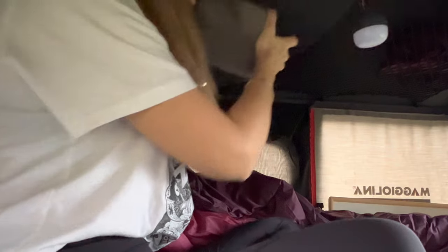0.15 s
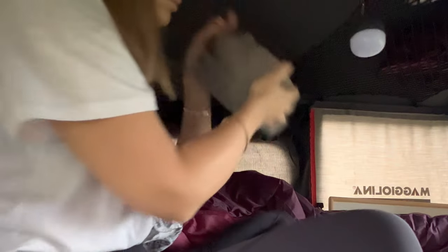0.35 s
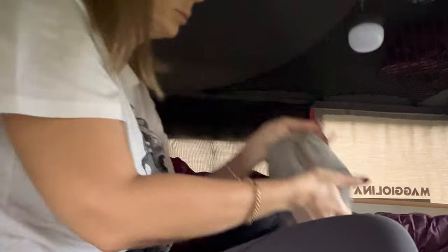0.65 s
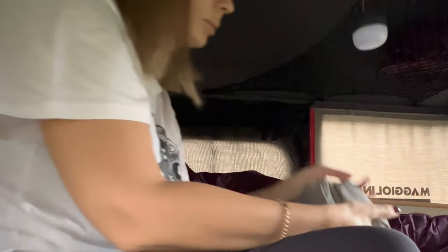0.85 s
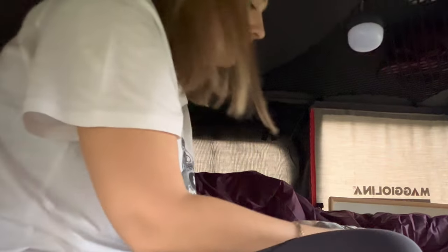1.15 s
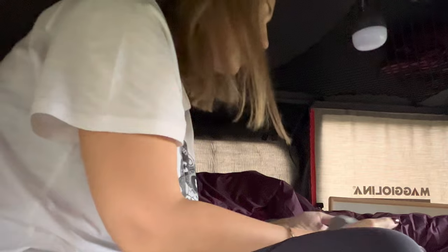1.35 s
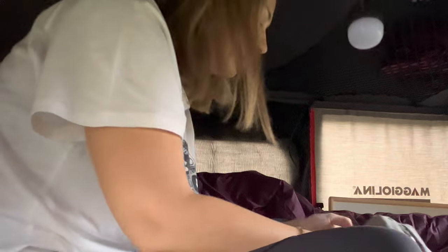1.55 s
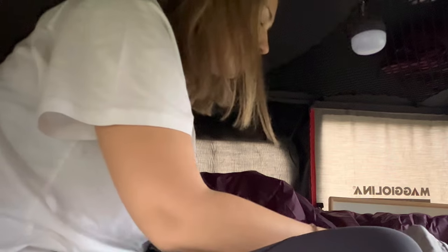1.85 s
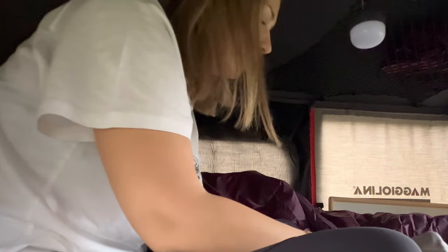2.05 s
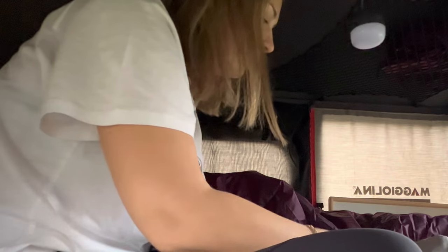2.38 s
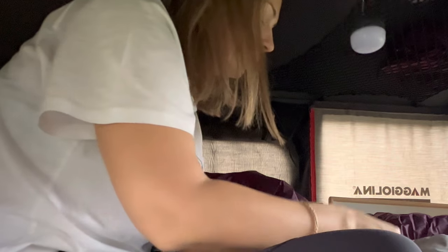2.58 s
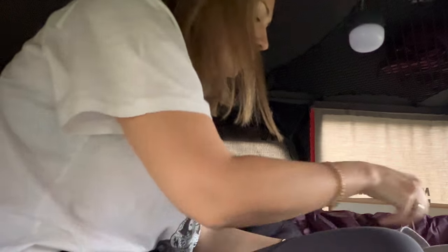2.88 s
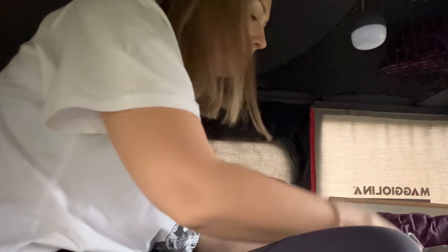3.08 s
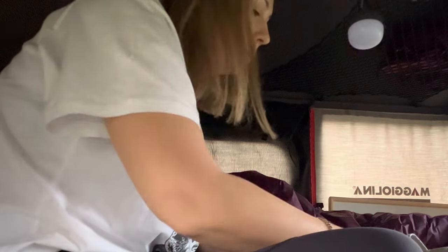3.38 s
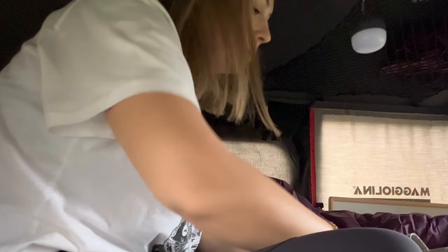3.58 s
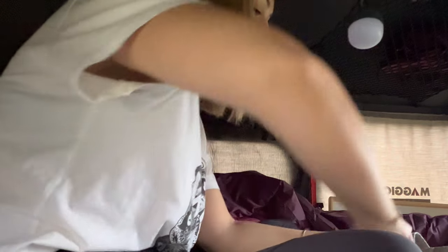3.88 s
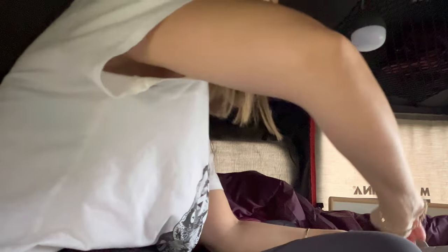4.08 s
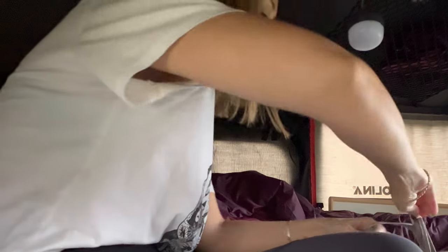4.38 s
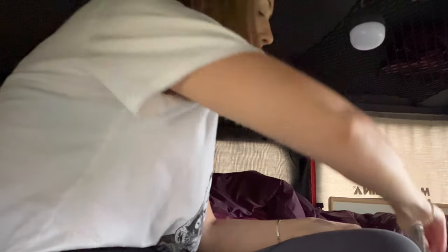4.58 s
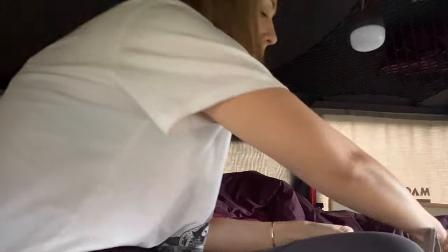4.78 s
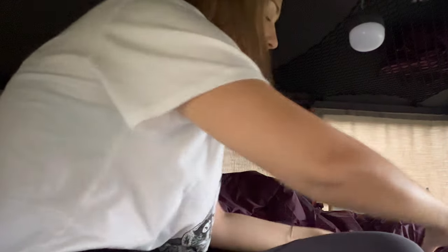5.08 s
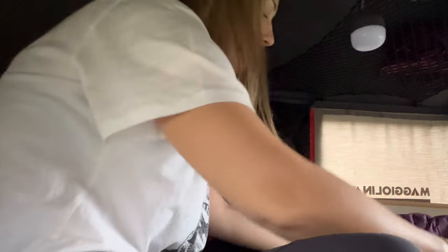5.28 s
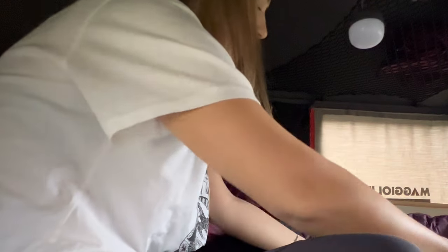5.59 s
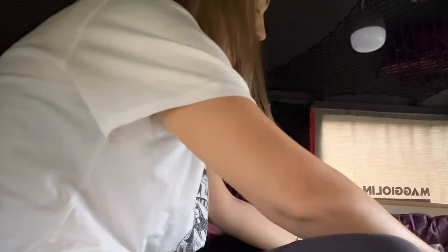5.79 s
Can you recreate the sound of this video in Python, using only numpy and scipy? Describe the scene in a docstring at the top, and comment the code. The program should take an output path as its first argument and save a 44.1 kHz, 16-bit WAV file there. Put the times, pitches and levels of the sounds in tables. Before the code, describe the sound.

Heard close on a phone: weight shifts dully on a padded floor and slick nylon swishes. A pouch smacks down on bedding, much the loudest moment. Small crease ticks follow, with a weak slow zip pull, then a burst of four zipper jerks, the second fastest and rising to a bright whine, with clicks. Rustling and soft rumble continue in a dry, boxy little tent.

```python
"""In a small hard-roofed tent, weight shifts on the padded floor and rubbed nylon open the scene near a phone.
A pouch is reached for overhead, rings hollow under the roof until 0.8 s and drops on nylon bedding at 1 s.
Its zip is jerked once at 2.4 s and four times from 3.9 to 4.7 s: teeth hum, knock, click and scrape with the
pull speed. Rubs, crease ticks and floor rumble run on to the end. Filtered noise makes cloth, floor and air,
sines the hum and thumps, short bursts the ticks; one set of cabin resonances colours hum, knocks and mids."""
import sys
import numpy as np
from scipy import signal
from scipy.fft import rfft, irfft, next_fast_len
from scipy.io import wavfile
from scipy.ndimage import uniform_filter1d

SR = 44100
rng = np.random.default_rng(int(sys.argv[2]) if len(sys.argv) > 2 else 0)


def waveform_to_disk(signal):
    """Save audio, clipped to [-1, 1], as 16-bit WAV at the path in sys.argv[1]."""
    frames = np.transpose(np.atleast_2d(signal))
    scaled = np.clip(frames, -1, 1) * 32767
    samples = np.round(scaled).astype(np.int16)
    wavfile.write(sys.argv[1], SR, samples)


N = 261953

# Every level below is set ahead of the cabin, the mix gains and the phone.
# faint air: [f/Hz, level/dB per Hz, relative]
AIR_SPECTRUM = [(24, -38.5), (40, 0), (151, 1), (439, -17), (712, -3), (886, -13), (1740, -13), (2970, -39),
                (6290, -25), (13000, -37)]
AIR_DB = -76  # rms
# weight shifting on the padded floor: [full from t/s, hold/s, rise/s, fall/s, rumble level/dB, thud level/dB]
FLOOR_SHIFTS = [(0.0, 0.003, .01, 0.03, -37.5, -37.5), (.11, 0.029, 0.5, 0.1, -68, -57),
                (.205, 0.024, 0.045, 0.18, -37.5, -57.5), (.33, 0.015, 0.052, 0.18, -35, -55),
                (.47, 0.023, 0.092, 0.084, -46, -90), (.58, 0.01, 0.15, 0.22, -54.5, -63),
                (1.0, 0.017, 0.033, 0.067, -44.5, -44), (1.04, 0.02, 0.08, 0.32, -55.5, -62),
                (1.2, 1, 0.25, 0.24, -67.5, -72), (1.93, .02, 0.62, 0.38, -58, -62.5),
                (2.68, 0.1, 0.48, 0.8, -69, -61), (2.95, 0.024, 0.66, 0.086, -60.5, -75),
                (3.09, 0.0066, .06, 0.071, -71.5, -78.5), (3.41, 0.012, 0.14, 0.054, -59.5, -68.5),
                (4.2, .01, 0.058, 0.51, -54.5, -53), (4.55, 0.015, 1, 0.063, -74, -51),
                (4.7, 0.0062, 0.13, 0.058, -52, -52), (4.83, 0.31, 0.18, 0.082, -61.5, -69.5),
                (5.21, 0.0093, 0.88, 0.7, -57, -59), (5.34, 0.01, 0.039, 0.55, -54, -67),
                (5.52, 0.0084, 0.25, 0.23, -59, -83), (5.76, 0.018, 0.1, 0.47, -53, -65.5)]
LEAN_S = (0.177, 0.6)  # span of the reach overhead
LEAN_TURN, REST_TURN = 2.63, 0.09  # radians the left port leads during the reach and otherwise
# soft blows on the bedding: [t/s, peak level/dB, ring f/Hz, 60 dB decay/s]
BEDDING_BLOWS = [(0.995, -28.5, 270, 0.061), (1.033, -41, 70, 0.24), (.999, -27, 570, 0.049),
                 (2.685, -33.5, 162, 0.045)]
# resonances of the cabin: [f/Hz, width/Hz, level/dB]
CABIN_MODES = [(65, 29, 3), (189.4, 42, -4), (315, 42, 3), (635.5, 47, 3.5), (722, 62, 3.5), (1086, 52, 5),
               (1350, 93, -6.5), (1801, 89, 0.5), (2090, 140, -6), (2460, 180, -6.5), (3500, 330, -28.5)]
# phase by which the left port trails for sounds close to the phone: [f/Hz, phase/rad]
NEAR_PHASE = [(100, 0.46), (700, 1), (1500, 0.26), (16000, 0.11)]
# nylon rubbed on nylon:
# [full from t/s, hold/s, rise/s, fall/s, crumple level/dB, swish level/dB, sheen level/dB re swish]
NYLON_RUBS = [(0.098, 0.051, 0.2, 0.12, -66.5, -51, 9), (0.289, 0.05, 0.17, 0.15, -75, -64.5, 8.5),
              (0.549, 0.15, 0.21, 0.17, -68.5, -56, 6), (0.956, 0.034, 0.29, 0.069, -65, -56, 6.5),
              (0.987, 0.022, 0.0044, 0.057, -39.5, -38.5, 0), (1.045, 0.0076, .05, 0.22, -62, -59, 7),
              (1.168, 0.38, 0.3, 0.35, -70.5, -68.5, -10), (1.87, 0.0057, 1, 0.72, -64, -56, 13.5),
              (2.222, 0.23, 0.16, 0.02, -78, -75.5, -10), (2.557, 0.078, 0.2, 0.081, -57, -70, -17),
              (2.665, 0.021, 0.0087, 0.07, -62, -51.5, 7), (2.717, 0.12, 0.12, 0.11, -60.5, -63.5, 9),
              (2.903, 0.07, 0.089, 0.23, -67, -70, 1.5), (3.14, 0.019, 0.084, 0.12, -74, -67, 7.5),
              (3.312, 0.011, 0.089, 0.32, -74, -67.5, 12), (3.659, 0.014, 0.15, 0.17, -74, -62, 10),
              (3.822, 0.05, 0.13, 0.11, -70, -62, 7), (4.2, 0.019, 0.035, 0.18, -52, -56, 12),
              (4.378, 0.0096, 0.11, 0.15, -54, -58.5, 13), (4.723, 0.025, 0.049, 0.16, -62.5, -62, -8),
              (4.81, 0.015, 0.13, 0.44, -59.5, -51.5, 10), (4.991, 0.3, 0.085, 0.64, -65, -57.5, 10.5),
              (5.4, 0.014, 0.08, 0.12, -59, -54, 7.5), (5.565, 0.097, 0.083, 0.014, -68, -58, 8),
              (5.757, 0.027, 0.015, 0.073, -61, -53.5, 3), (5.93, .01, 0.79, .1, -60, -54, 12.5)]
# tone of the swish: [f/Hz, level/dB per Hz, relative]
SWISH_SPECTRUM = [(1500, -4), (2500, -3.5), (3300, -4), (4600, -0.5), (6700, -2), (9000, -8),
                  (11500, -15.5), (13500, -25), (15800, -7)]
RANGE_DB = 27  # a rub or shift fades this far over its rise and its fall
CRUMPLE_PAN_DB, SWISH_PAN_DB = -3.5, 2.5  # left minus right
ALOFT_UNTIL_S, ALOFT_HZ, ALOFT_DB = 0.77, (1216, 1426), 11  # pouch held under the roof; dB re crumple
# creases, puller ticks and the landing pouch:
# [t/s, peak level/dB, centre f/Hz, treble level/dB re peak, left minus right level/dB]
CLOTH_TICKS = [(0.073, -41.5, 1460, -13, 5), (0.525, -40.5, 1230, -26, 8), (0.563, -37.5, 1350, -30, 5),
               (0.644, -47, 1350, -2, 7), (0.974, -35.5, 1580, -25, -24), (0.98, -27, 1430, -23, -6),
               (0.988, -10.5, 1940, -6.5, 2), (0.992, -17, 2300, -19, -4), (0.997, -27, 1100, -20, -11),
               (1.003, -30, 1230, -23, -5), (1.019, -29, 1020, -26, -2), (1.037, -34.5, 1460, -23, -8),
               (1.077, -58, 1000, -25, -4), (1.148, -55, 950, -25, -2), (1.212, -52, 1650, -25, -5),
               (1.263, -59, 4320, -54, 6), (1.338, -47, 1000, 2.5, -6), (1.411, -43, 1110, -29, -5),
               (2.352, -44, 1370, -40, -4), (2.36, -49, 1100, -61, -9), (2.631, -54, 910, 13, -3),
               (2.666, -43.5, 2200, 3, -2), (2.681, -38, 860, -6, -7.5), (2.731, -46, 1080, -18, -3),
               (2.758, -36, 1070, -28, -6), (2.831, -43.5, 4600, -15, 2), (2.836, -40.5, 885, -22, -4),
               (2.876, -49.5, 940, 5.5, -1), (2.903, -40, 1100, -0.5, -3), (2.952, -59, 1150, -11, -8),
               (2.972, -49, 1056, -5, -2.5), (3.105, -61.5, 2440, -19, 7.5), (3.134, -56, 1100, 1, -9),
               (3.61, -48.5, 2080, -4, -1), (3.773, -52, 1830, -8, -3), (3.811, -39, 1533, -32, -4.5),
               (3.903, -50.5, 1130, -10, -10), (4.334, -44, 970, 7, -8), (4.383, -28.5, 1950, 2.5, -2),
               (4.461, -34, 2010, 2, -1), (4.511, -39, 1927, 3, -4), (4.54, -54, 1877, 12.5, 12),
               (4.722, -40.5, 2200, -2, 1), (4.741, -47, 1004, -36, -9), (4.779, -51, 747, -30, -8),
               (4.789, -35.5, 5550, -20, 6.5), (4.82, -48, 1994, 2, -2), (4.911, -45, 1090, -19, -6),
               (4.967, -47.5, 1230, -26, -11), (5.005, -46, 970, -19, -11), (5.013, -48, 1020, -14, -14),
               (5.029, -39.5, 850, -17, -6), (5.099, -41.5, 1030, 1.5, -6), (5.115, -37, 880, -16, -1),
               (5.202, -58, 1510, -15, -1), (5.225, -46, 1140, -21, -3), (5.393, -42.5, 900, -9, -8),
               (5.41, -42, 3500, -13, 2), (5.756, -45.5, 4540, -3, 0), (5.771, -46, 4750, 9.5, -11),
               (5.833, -43.5, 910, -16, -3), (5.888, -44.5, 1750, 9.5, 6)]
TICK_DECAY_S, HARD_EXTRA_S = 0.02, 0.00037  # 60 dB decay; harder blows ring a little longer
HAND_DAMPING = 2.2  # cloth in the hands widens the resonances that a tick excites
CREASES = 420  # small random ticks
CREASE_DB, CREASE_SPREAD_DB = 4.5, 3.5  # re the rub's crumple level
CREASE_HZ, CREASE_TREBLE_DB = 1100, -12.5  # typical centre; typical treble re peak
# slider strokes, one list of rows per jerk: [t/s, tooth rate f/Hz, hum level/dB, knock level/dB]
ZIP_JERKS = [
    [(2.44, 113.5, -97, -86), (2.5, 122.9, -81, -72), (2.57, 155.2, -56, -74), (2.61, 179.3, -71, -54),
     (2.645, 194, -57, -69)],
    [(3.9, 132, -68, -90), (3.93, 161.5, -59, -61), (3.965, 245.8, -51, -66), (3.998, 296.2, -54.5, -48.5)],
    [(4.0, 198.5, -54, -54), (4.05, 241.2, -54, -49), (4.066, 291.9, -52, -41), (4.09, 344.6, -49.5, -46.5),
     (4.102, 375, -39, -43), (4.118, 458.5, -45, -44), (4.127, 570, -57, -40.5), (4.152, 729, -34.5, -64),
     (4.168, 795.3, -35.5, -40), (4.18, 798.6, -47, -48), (4.197, 713, -49, -65)],
    [(4.2, 166.3, -47.5, -54), (4.27, 149.4, -50, -62.5), (4.32, 155.4, -71, -65), (4.36, 181.9, -50, -70),
     (4.4, 219.9, -49.5, -84), (4.44, 195, -53, -56)],
    [(4.445, 151.2, -62, -57), (4.482, 184.4, -51, -57), (4.516, 238.7, -47, -58), (4.532, 261, -48, -53),
     (4.55, 303.7, -66, -50), (4.572, 291.3, -72, -49.5), (4.615, 347.8, -51.5, -49),
     (4.638, 359.4, -49, -52), (4.652, 340.3, -69, -47.5), (4.668, 340.7, -67, -46.5),
     (4.685, 342, -68, -63), (4.697, 323, -58, -38), (4.705, 347, -83, -97)],
]
# dry click of each tooth leaving the slider, one per jerk, at the reference rate: [level/dB]
JERK_CLACK_DB = [-61.5, -58.5, -57, -67.5, -62.5]
# scrape of the slider, one per jerk, at the reference rate: [level/dB]
JERK_SCRAPE_DB = [-48, -55, -48.5, -51.5, -50]
REFERENCE_HZ = 300  # tooth rate
CLACK_HZ, CLACK_SCATTER_DB, CLACK_DB_PER_OCTAVE = (1000, 2300), 4.5, 2.2
SCRAPE_DB_PER_OCTAVE, SCRAPE_CRUMPLE_DB = 8, -10  # growth with tooth rate; mids re swish
ONSET_S = 0.064  # drag on the cloth is smoothed over this long
TOP_HZ = 15800  # upper limit of the phone
LEFT_LAG = 2  # samples; the left port is a little further from the hands


def undb(db):
    """Decibels to gain."""
    return 10 ** (np.asarray(db) / 20)


def unit(x):
    """Scale to rms 1."""
    return x / np.sqrt(np.mean(x ** 2))


def band(x, lo_hz, hi_hz, order=2):
    """Butterworth band-pass along time."""
    sos = signal.butter(order, [lo_hz, min(hi_hz, .45 * SR)], "band", fs=SR, output="sos")
    return signal.sosfilt(sos, x)


def columns(table):
    """Curve columns at every sample."""
    s, *rest = np.transpose(table)
    return [np.interp(np.arange(N) / SR, s, c) for c in rest]


def colour(x, points):
    """Shape noise by (Hz, dB) points joined on a log frequency axis; rms 1."""
    hz, db = np.transpose(points)
    bins = np.maximum(np.arange(N // 2 + 1) * SR / N, 1)
    gain = undb(np.interp(np.log(bins), np.log(hz), db))
    return unit(irfft(rfft(x) * gain, N))


def walk(rate):
    """Random levels, rate of them a second, joined by slides; rms 1."""
    k = int(SR / rate)
    steps = np.repeat(rng.standard_normal(N // k + 1), k)
    return unit(uniform_filter1d(steps, k)[:N])


def pair(likeness):
    """Left and right noise of rms 1 with the given correlation."""
    mid, side = rng.standard_normal((2, N))
    c = np.clip(likeness, 0, 1)
    return np.sqrt((1 + c) / 2) * mid + np.sqrt((1 - c) / 2) * side * np.array([[1], [-1]])


def pan(db):
    """Left and right gains for a left minus right level."""
    return undb(np.array([db, -db]) / 2)


def swells(table):
    """Rise, hold and fall of each row, summed in power; one gain curve for each level column."""
    t, power = np.arange(N) / SR, 0
    for s, hold_s, rise_s, fall_s, *db in table:
        before = np.maximum((s - t) / max(rise_s, .005), 0)
        after = np.maximum((t - s - hold_s) / max(fall_s, .005), 0)
        fade = undb(-RANGE_DB * np.minimum(before + after, 8))
        power = power + np.outer(undb(db), fade) ** 2
    return np.sqrt(power)


def grains(rate, spread_db, ring_s):
    """Envelope of many tiny creases: sparse random sizes, each dying fast, over a steady bed."""
    sizes = undb(spread_db * np.minimum(rng.exponential(size=N), 2))
    hits = (rng.random(N) < rate / SR) * sizes
    return unit(signal.lfilter([1], [1, -np.exp(-1 / (ring_s * SR))], hits) + 2.24)


def air():
    """Faint stationary noise, strongest in the bass and wide between the ports."""
    return colour(pair(0.18), AIR_SPECTRUM) * undb(AIR_DB)


def cabin(x, damped=1):
    """Air modes of the low cabin: parallel resonances of alternating sign."""
    out = 0
    for k, (hz, width, db) in enumerate(CABIN_MODES):
        mode = signal.lfilter(*signal.iirpeak(hz, hz / width / damped, SR), x)
        out = out + (-1) ** k * undb(db) * mode
    return out


def walls(x, t60_s, wet_db):
    """Direct sound plus a short scatter from roof and cloth, different at each port."""
    t = np.arange(int(.15 * SR)) / SR
    tail = rng.standard_normal((2, len(t))) * np.exp(-np.log(1000) * t / t60_s) * (t > .001)
    tail = tail / np.sqrt(np.sum(tail ** 2, axis=1, keepdims=True))
    return x + undb(wet_db) * signal.fftconvolve(x, tail, axes=1)[:, :N]


def floor_rumble():
    """Low modes of the floor shaken by noise; the ports near opposite phase during the reach overhead."""
    rumble, thud = swells(FLOOR_SHIFTS)
    low = unit(band(pair(0.9), 40.6, 89.6)) * rumble * undb(1.0 * walk(34))
    low = low + unit(band(pair(0.77), 116, 255)) * thud * undb(0.6 * walk(40))
    t = np.arange(N) / SR
    reaching = (t > LEAN_S[0]) & (t < LEAN_S[1])
    turn = uniform_filter1d(np.where(reaching, LEAN_TURN, REST_TURN), SR // 40)
    lean = undb(2.0 * turn)  # the left port is nearer when the phases part
    right = np.real(signal.hilbert(low[1], next_fast_len(N))[:N] * np.exp(-1j * turn))
    return np.array([low[0] * lean, right])


def thumps():
    """Each blow on the bedding rings once as a low, well damped sine."""
    out, t = np.zeros(N + SR), np.arange(int(.3 * SR)) / SR
    for s, db, hz, decay_s in BEDDING_BLOWS:
        ring = np.sin(2 * np.pi * hz * t) * np.exp(-np.log(1000) * t / decay_s)
        start = int(s * SR)
        out[start:start + len(t)] += undb(db) * ring
    return out[:N]


def nylon(scrape, drag):
    """Crumple is coarse creases in the mids; swish is finer friction in the treble; both follow rub and drag."""
    rows = [(*r[:6], r[5] + r[6]) for r in NYLON_RUBS]  # sheen from relative to absolute level
    rubbed = swells(rows)
    coarse, fine, sheen = np.hypot(rubbed, drag * undb([[SCRAPE_CRUMPLE_DB], [0], [1.5]]))
    crumple = band(pair(0.6), 500, 3100, order=1) * grains(rate=160, spread_db=6.5, ring_s=0.0061)
    crumple = unit(crumple) * coarse * undb(5.5)
    swish = colour(pair(0.057), SWISH_SPECTRUM) * grains(rate=510, spread_db=-4.0, ring_s=0.002)
    swish = swish * undb(1.7 * walk(28))
    # the lower treble comes and goes, and the slider has less of it
    lower_gain = undb(2.6 * walk(9) - 2.1 * drag / fine)
    swish = swish + (lower_gain - 1) * band(swish, 2100, 5700)
    # the top of the treble takes the sheen level instead
    top_change = sheen * undb(2.8 * walk(13)) - fine
    swish = swish * fine + top_change * band(swish, 9470, 19000)
    return crumple * pan(CRUMPLE_PAN_DB)[:, None], swish * scrape * pan(SWISH_PAN_DB)[:, None], rubbed[0]


def hollow_pouch(crumple):
    """While the pouch is held up under the roof, a narrow band of its crumple rings hollow."""
    held = np.arange(N) < ALOFT_UNTIL_S * SR
    return band(crumple, *ALOFT_HZ) * uniform_filter1d(held * undb(ALOFT_DB), SR // 15)


def creases(crumple):
    """Small ticks at random moments, their level following the rubbed cloth just then."""
    s = rng.random(CREASES) * N / SR
    size, pitch, side = rng.standard_normal((CREASES, 3)).T
    db = 20 * np.log10(crumple[(s * SR).astype(int)] + 1e-9) + CREASE_DB + CREASE_SPREAD_DB * size
    return list(zip(s, db, CREASE_HZ * 2 ** (0.41 * pitch), CREASE_TREBLE_DB + 6 * pitch, -3 + 3 * side))


def ticks(table):
    """A crunch around each centre with a thin treble click; harder blows start more sharply."""
    body, top = np.zeros((2, 2, N + SR))
    t = np.arange(int(.12 * SR)) / SR
    noises = rng.standard_normal((len(table), 2, len(t)))
    for (s, db, hz, treble_db, pan_db), noise in zip(table, noises):
        force = undb(db + 37.0)
        rise = 1 - np.exp(-t * (900 + 4000 * force))
        fall = rise * np.exp(-np.log(1000) * t / (TICK_DECAY_S + HARD_EXTRA_S * force))
        edge = (t == 0) * min(2.5 + 6 * force, 30)
        wide = min(1, (1500 / hz) ** 0.87)  # high ticks ring in a narrower band
        crunch = band(edge * wide + noise[0] * fall, hz / 1.734 ** wide, hz * 1.367 ** wide)
        click = band(edge + noise[1] * fall ** 1.1, 3200, 13000)
        at = slice(int(s * SR), int(s * SR) + len(t))
        body[:, at] += np.outer(pan(pan_db) * undb(db + 0.5), crunch / np.abs(crunch).max())
        top[:, at] += np.outer(pan(pan_db) * undb(db + treble_db), click / np.abs(click).max())
    return body[:, :N], top[:, :N]


def zipper(scatter_db, puff):
    """The tooth rate hums in the pouch cloth, each tooth knocks and clicks, and the scrape pulses with it."""
    hz, (hum, knock, drag, clack) = np.full(N, 100.), np.zeros((4, N))
    for stroke, scrape_db, clack_db in zip(ZIP_JERKS, JERK_SCRAPE_DB, JERK_CLACK_DB):
        on = slice(int(stroke[0][0] * SR), int(stroke[-1][0] * SR))
        rate_hz, hum_db, knock_db = columns(stroke)
        octaves = np.log2(rate_hz[on] / REFERENCE_HZ)
        hz[on], hum[on], knock[on] = rate_hz[on], undb(hum_db)[on], undb(knock_db)[on]
        clack[on] = undb(clack_db + CLACK_DB_PER_OCTAVE * octaves)
        drag[on] = undb(scrape_db + SCRAPE_DB_PER_OCTAVE * octaves)

    # the pull is unsteady, slow pulls most of all
    jitter = .05 * np.clip(1.55 - hz / REFERENCE_HZ, .15, 1)
    turns = np.cumsum(hz * (1 + .02 * walk(90) + jitter * walk(300)) / SR)
    tooth = turns.astype(int)
    size = undb(scatter_db * rng.standard_normal(N // 20))[tooth]
    teeth = np.diff(tooth, prepend=0) * size * np.sqrt(SR / hz)  # same power at any speed

    knocks = unit(band(teeth, 513, 903)) * undb(2.5 * walk(60))  # the pouch rings near 700 Hz
    partials = sum(undb(3.1 * walk(70)) * np.sin(2 * np.pi * k * turns + k * k) / k ** 0.26
                   for k in range(2, 8))
    # upper partials climb with the pull speed
    knocks = knocks + undb(-9.0) * size * np.sqrt(hz / REFERENCE_HZ) * partials

    smooth = int(.004 * SR)
    buzz = np.sqrt(2) * np.sin(2 * np.pi * turns) * uniform_filter1d(hum * size, smooth)
    buzz = buzz + knocks * uniform_filter1d(knock, smooth)

    scatter = CLACK_SCATTER_DB * np.minimum(REFERENCE_HZ / hz / 2, 1)  # fast pulls run more evenly
    uneven = undb(scatter * np.tanh(rng.standard_normal(N // 20))[tooth])
    clacks = unit(band(teeth * uneven, *CLACK_HZ)) * uniform_filter1d(clack, 8 * smooth)

    pulses = unit(size * np.exp(-(turns % 1) / puff))  # each tooth starts a puff of scrape
    scrape = np.where(hum > 0, pulses, 1)
    return buzz * pan(-2.0)[:, None], clacks, scrape, uniform_filter1d(drag, int(ONSET_S * SR))


def trail_left(near):
    """Close sounds reach the left port with a phase lag that depends on frequency."""
    trail = np.interp(np.arange(N // 2 + 1) * SR / N, *np.transpose(NEAR_PHASE))
    return np.array([irfft(rfft(near[0]) * np.exp(-1j * trail), N), near[1]])


def scene():
    """Hum, knocks and mids pass through the cabin resonances; ticks and clicks also scatter off the walls."""
    buzz, clacks, scrape, drag = zipper(scatter_db=0.5, puff=1.0)
    crumple, swish, rubbed = nylon(scrape, drag)
    taps, clicks = ticks(CLOTH_TICKS + creases(rubbed))
    cloth = cabin(crumple * scrape) * undb(2.5) + hollow_pouch(crumple) + swish
    tapped = cabin(taps, damped=HAND_DAMPING) * undb(-1.0) + taps * undb(-2.5) + clicks
    near = walls(tapped, t60_s=0.026, wet_db=-0.5)
    near = near + cabin(buzz) * undb(4.0)
    near = near + walls(np.array([clacks, clacks]), t60_s=0.021, wet_db=-2) + thumps()
    return trail_left(near) + cloth + floor_rumble() + air()


def record(dry):
    """The left port hears slightly later; the phone drops the deepest bass, dulls the treble and cuts the top."""
    ports = band(np.array([np.roll(dry[0], LEFT_LAG), dry[1]]), 31, 11000)
    return signal.sosfilt(signal.ellip(8, .2, 70, TOP_HZ, fs=SR, output="sos"), ports)


dry = scene()
out = record(dry)
waveform_to_disk(out)
```